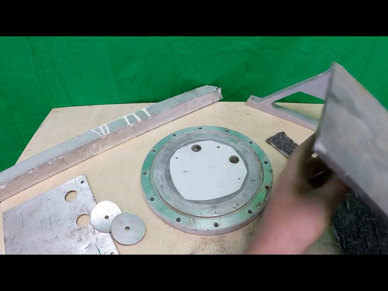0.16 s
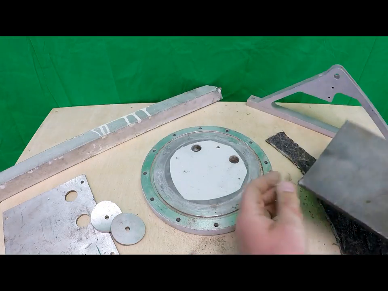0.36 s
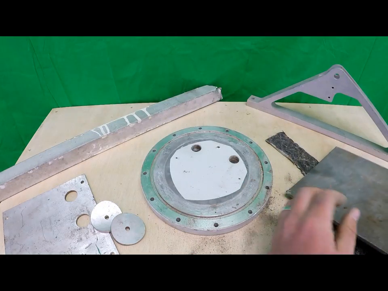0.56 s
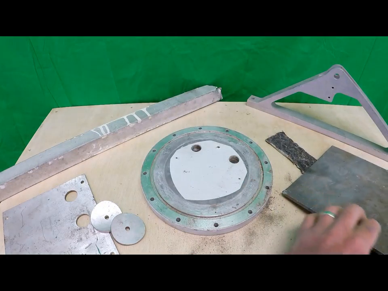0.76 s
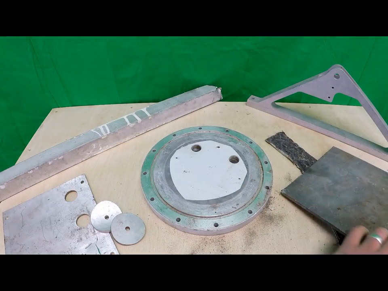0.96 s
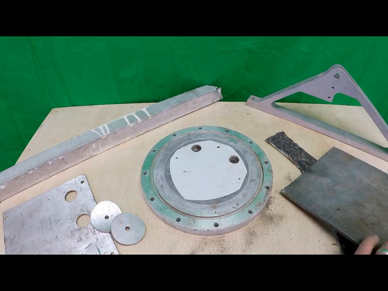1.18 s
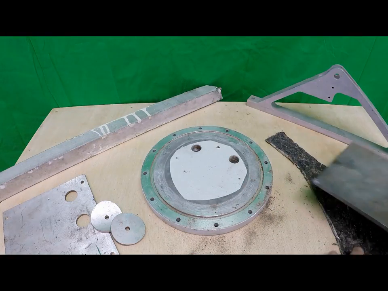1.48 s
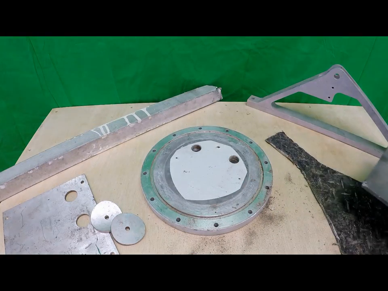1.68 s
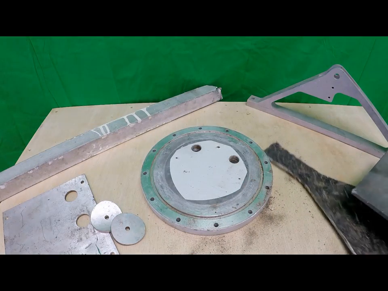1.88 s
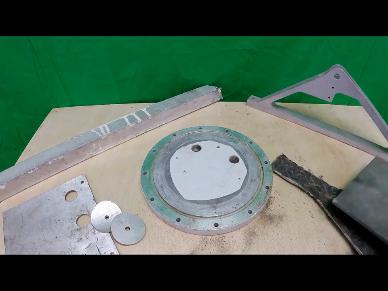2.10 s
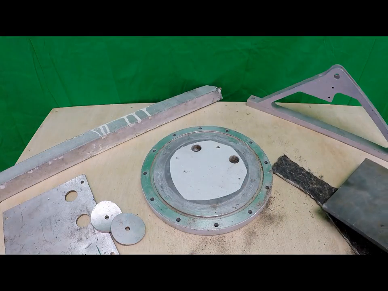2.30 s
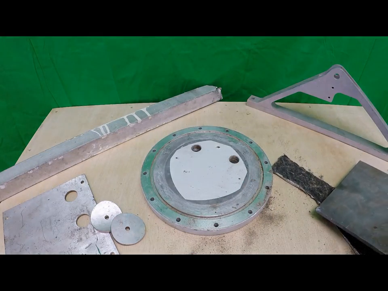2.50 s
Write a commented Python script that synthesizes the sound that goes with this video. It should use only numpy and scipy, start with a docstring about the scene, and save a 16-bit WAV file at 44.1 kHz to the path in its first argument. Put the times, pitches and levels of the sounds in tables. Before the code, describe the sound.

A metal plate knocks and scrapes on a wooden table in a small room.

```python
"""Metal plate on a wooden table

In a small room a metal plate is tipped onto a rubber mat on a table, nudged, dragged and let down.
Its edge ticks and pings; the table answers each knock with a dull thud and rocks a little.
In the drag the edge sticks and slips, so the plate rings and the table top judders.
A faint hiss and a low hum swell and dip underneath."""
import sys
import numpy as np
from scipy import signal
from scipy.fft import rfft, irfft, next_fast_len
from scipy.io import wavfile
from scipy.ndimage import uniform_filter1d

SR = 44100
rng = np.random.default_rng(int(sys.argv[2]) if len(sys.argv) > 2 else 0)


def to_wav(s):
    """Save 16-bit WAV."""
    ch = np.atleast_2d(s).T  # columns
    pcm = np.round(np.clip(ch, -1, 1) * 32767)  # PCM
    wavfile.write(sys.argv[1], SR, pcm.astype(np.int16))


N = 116865


def amp(db):
    """Decibels to gain."""
    return 10 ** (np.asarray(db) / 20)


def unit(x):
    """Scales to an rms of 1."""
    return x / np.sqrt(np.mean(x ** 2) + 1e-20)


def read(points, hz):
    """Reads a curve on a log-frequency axis."""
    freqs, values = np.transpose(points)
    return np.interp(np.log(hz + 1), np.log(freqs + 1), values)


def add(mix, start_s, sound):
    """Drops a sound into the mix."""
    part = mix[round(start_s * SR):][:len(sound)]
    part += sound[:len(part)]


def through(x, response):
    """Passes a sound through an impulse response."""
    return signal.fftconvolve(np.atleast_2d(x), np.atleast_2d(response), axes=1)[:, :N]


def colour(x, eq):
    """Minimum-phase EQ: nothing rings ahead of an attack."""
    log_gain = np.log(amp(read(eq, abs(np.fft.fftfreq(8192, 1 / SR)))))
    spectrum = np.exp(np.conj(signal.hilbert(log_gain)))
    return through(x, np.fft.ifft(spectrum).real[:4096])


def steady(x, span_s):
    """Levels a texture, ironing out swings slower than span_s."""
    power = uniform_filter1d((x ** 2).mean(0), int(span_s * SR))
    return x / np.sqrt(abs(power) + 1e-12)


def ring(modes, damping=1):
    """Dying tones of a struck object, with an energy of 1; damping divides each decay time."""
    t = np.arange(SR) / SR
    tones = sum(amp(db - 60 * t * damping / t60) * np.cos(2 * np.pi * hz * t) for hz, db, t60 in modes)
    return tones / np.linalg.norm(tones)


def body(force, modes, ring_db, damping=1):
    """A force heard directly and through the modes of an object."""
    return force + amp(ring_db) * through(force, ring(modes, damping))


# How alike the room sounds at the two mic ports: freq_hz, coherence
PORT_COHERENCE = [(300, 1), (800, .99), (1500, .8), (4000, .65), (7000, .25), (14000, 0)]

def pair(noises):
    """Makes two unrelated signals alike in the bass, as two close ports hear them."""
    size = noises.shape[1]
    shared, separate = rfft(noises)
    alike = np.clip(read(PORT_COHERENCE, np.fft.rfftfreq(size, 1 / SR)), 0, 1)
    return irfft([alike * shared + np.sqrt(1 - alike ** 2) * separate, shared], size)


# The small room's reverb, before decay_scale: freq_hz, t60_s
ROOM_DECAY = [(100, 0.42), (300, 0.27), (700, 0.25), (2000, 0.17), (6000, 0.29), (14000, 0.098)]

def room(wet_db, decay_scale=1):
    """Direct sound and a dense stereo tail of reflections."""
    hz, t, noise = signal.stft(pair(rng.choice([-1., 1.], (2, SR))), SR, nperseg=256)
    t60_s = decay_scale * read(ROOM_DECAY, hz)[:, None]
    tail = signal.istft(noise * amp(-60 * t / t60_s), SR, nperseg=256)[1]
    response = amp(wet_db) * tail / np.linalg.norm(tail[1])
    response[:, 0] += 1
    return response / np.linalg.norm(response[1])


# Tone of the airy hiss and of the low hum: freq_hz, gain_db
HISS_EQ = [(800, -6.5), (2500, -15.5), (5000, -10.5), (7500, -1), (10000, -0.5), (12500, -5), (15000, -19)]
HUM_EQ = [(20, 4.5), (62, 4), (110, -7.5), (160, -15.5), (240, -16), (330, -23.5), (620, -19.5),
          (850, -38.5), (2000, -45), (5000, -65)]
# Fader moves on the room tone: time_s, hiss_db, hum_db
ROOM_TONE_FADES = [(0, -81.5, -65), (.35, -84, -63.5), (.7, -70.5, -59), (.76, -78, -40.5),
                   (.98, -78.5, -62.5), (1.4, -69, -56.5), (1.85, -66.5, -53.5), (2, -80, -76.5),
                   (2.45, -85, -53), (2.65, -94.5, -61)]

def room_tone():
    """A bed of low room noise and thin hiss, both swelling and dipping."""
    times, hiss_db, hum_db = np.transpose(ROOM_TONE_FADES)
    t = np.arange(N) / SR
    hiss = unit(colour(rng.standard_normal((2, N)), HISS_EQ))
    hum = unit(colour(pair(rng.standard_normal((2, N))), HUM_EQ))
    return amp(np.interp(t, times, hiss_db)) * hiss + amp(np.interp(t, times, hum_db)) * hum


def burst(hz, width_hz):
    """A brief ring around one pitch: the wider the band, the shorter."""
    t = np.arange(1, SR // 50) / SR
    envelope = t * np.exp(-np.pi * width_hz * t)
    return envelope / envelope.sum() * np.sin(2 * np.pi * hz * t)


# The plate's modes, lying flat and overhanging the table's edge: pitch_hz, flat_db, overhang_db
PLATE_MODES = [(1087, -11, -20), (1141, -11, -11), (1312, -14, -10), (1731, -18, -15), (2121, -17, -24),
               (2439, -10, -18), (2680, -18, -12), (2790, -17, -12), (3198, -17, -28), (3420, -14, -10),
               (3785, -21, -12), (4160, -25, -17), (5076, -16, -20), (6325, -20, -20)]
# Bright tone of the plate's edge: freq_hz, gain_db
EDGE_EQ = [(200, -6), (900, -9.5), (1800, 3.5), (4000, 0), (6300, 8), (7800, -3.5), (11000, -5.5),
           (15000, -46.5)]
# Hits of the edge: start_s, tick_db, tick_hz, tick_width_hz, ping_db, ping_hz
EDGE_HITS = [(.584, -36, 7500, 6000, -29.5, 4550), (0.72, -4, 1105, 1034, -19, 3600),
             (.776, -41, 5900, 600, -27.5, 3700), (.994, -41, 5950, 1200, -30.5, 3680),
             (1.351, -30.5, 2400, 1460, -21.5, 3950), (1.421, -30, 2000, 1200, -23, 3750),
             (1.680, -18, 1900, 1620, -11, 3880), (1.871, -12, 5000, 7000, -9.5, 3780),
             (2.043, -11, 3000, 4000, -2, 5880), (2.205, -13, 4800, 4000, -1.5, 3790),
             (2.275, -16, 4100, 2500, -35, 2800), (2.312, -16, 4100, 1800, -15, 6300),
             (2.325, -26, 8000, 9000, -12, 5000), (2.337, -17, 1410, 1200, -15, 1980)]

def edge_clicks():
    """The edge ticks against things, each spot with its own ping; hand and mat damp the plate's ring."""
    level_db, ring_t60_s = 8, 0.045
    force = np.zeros(N)
    for start_s, tick_db, tick_hz, width_hz, ping_db, ping_hz in EDGE_HITS:
        tick = amp(tick_db) * burst(tick_hz, width_hz)
        ping = amp(ping_db) * burst(ping_hz, width_hz=480)
        add(force, start_s, tick + ping)
    modes = [(hz, flat_db, ring_t60_s) for hz, flat_db, _ in PLATE_MODES]
    clicks = colour(body(force, modes, ring_db=-16.5), EDGE_EQ)
    return amp(level_db) * through(clicks, room(wet_db=0, decay_scale=0.25))


def arch(length_s):
    """A rounded swell, quick in and quick out."""
    return np.sin(np.pi * np.arange(0, 1, 1 / (length_s * SR))) ** .5


def slips(per_s, spread_db):
    """Friction as a random train of slips of uneven size."""
    size = amp(spread_db * np.minimum(rng.exponential(1, N), 3))
    return size * rng.choice([-1, 1], N) * (rng.random(N) < per_s / SR)


# Tone of the rub on rubber and of the hollow chatter: freq_hz, gain_db
RUB_EQ = [(400, -23), (1000, -2), (2200, 2), (2950, -11), (3700, 4.5), (4900, -6.5), (5900, 1),
          (7500, -15.5), (14000, -35)]
CHATTER_EQ = [(90, -34), (250, -7), (420, 0), (570, 5), (720, -5.5), (950, -20), (2000, -42.5),
              (4000, -60.5), (12000, -95.5)]
# Light slides on the mat: start_s, length_s, rub_db, chatter_db
MAT_SLIDES = [(0.716, 0.18, -66.5, -35.5), (1.363, 0.13, -66.5, -81), (1.694, 0.092, -54.5, -42.5),
              (1.78, 0.082, -70, -69.5), (2.301, 0.052, -55.5, -42.5)]

def mat_slides():
    """The plate rubs over the mat as it settles or is nudged, and chatters softly against the table."""
    rub_gain, chatter_gain = np.zeros(N), np.zeros(N)
    for start_s, length_s, rub_db, chatter_db in MAT_SLIDES:
        add(rub_gain, start_s, amp(rub_db) * arch(length_s))
        add(chatter_gain, start_s, amp(chatter_db) * arch(length_s))
    rub = unit(colour(slips(per_s=1300, spread_db=3), RUB_EQ))
    chatter = steady(colour(slips(per_s=500, spread_db=-0.5), CHATTER_EQ), span_s=0.022)
    return through(rub_gain * rub + chatter_gain * chatter, room(wet_db=-5, decay_scale=0.82))


def contact(brightness_hz):
    """The push of one cushioned contact: the softer, the longer."""
    t = np.arange(1, SR // 20) / SR
    push = t ** 2 * np.exp(-2 * np.pi * brightness_hz * t * np.sqrt(2))
    return push / push.sum()


# Modes of the table top, before extra damping: pitch_hz, level_db, t60_s
TABLE_MODES = [(136, -4, .2), (153, -6, .25), (186, -6, .18), (229, 0, .4), (290, 2, .35), (345, -9, .15),
               (414, 7.5, .3), (455, -1, .2), (560, -1, .22), (635, 1, .24), (690, -3, .18), (777, -3, .25),
               (817, -4, .25), (934, 0, .25)]
# The table rocking on its legs: pitch_hz, level_db, t60_s
LEG_MODES = [(30.8, 7.5, 0.31), (62.6, 9, 0.22)]
# Dull tone of the wood: freq_hz, gain_db
WOOD_EQ = [(40, -37), (100, -11.5), (145, 2), (300, -9.5), (420, -8), (600, 5.5), (820, -6), (1100, -5.5),
           (1500, -10), (2300, -25.5), (4000, -23.5), (12000, -54)]
# Knocks on the table: start_s, thud_db, brightness_hz, rock_db
TABLE_HITS = [(.721, -15.5, 2163, -41), (.725, -11.5, 1430, -32.5), (.731, -4, 862, -45),
              (0.738, -6, 839, -24), (.771, -2, 397, -8), (0.777, -8, 232, -27), (.797, -13, 787, -12.5),
              (0.819, -9, 265, -10.5), (.875, -32.5, 764, -9), (1.424, -18, 129, -31),
              (1.688, -15, 458, -16), (1.706, 0.5, 185.8, -13), (1.725, -14, 222.6, -5.5),
              (1.764, -19.5, 247, -5.5), (1.879, -2, 694, -4.5), (2.038, 8, 362, -10.5),
              (2.073, 9, 205, -18.5), (2.208, -17, 612, -9.5), (2.327, -18.5, 600, -32),
              (2.337, -8, 1900, -11.5), (2.342, -14.5, 1250, -17), (2.353, -4, 322, -30),
              (2.358, -15.5, 840, -32), (2.382, -23.5, 440, -13.5), (2.4, -12, 378, -21.5)]

def table_knocks():
    """The plate lands on the mat: the table top thuds and the table rocks."""
    thud_gain, rock_gain = amp(22.5), amp(-18.5)
    force, shove = np.zeros(N), np.zeros(N)
    for start_s, thud_db, brightness_hz, rock_db in TABLE_HITS:
        add(force, start_s, amp(thud_db) * contact(brightness_hz))
        add(shove, start_s, amp(rock_db) * contact(brightness_hz=93))
    wood = colour(body(force, TABLE_MODES, ring_db=-10.5, damping=2.19), WOOD_EQ)
    thud = through(wood, room(wet_db=8, decay_scale=0.69))
    legs = ring(LEG_MODES)
    return thud_gain * thud + rock_gain * through(shove, legs / legs.max())


def drift(rate_hz):
    """A slow random wobble with an rms near 1."""
    points, control_hz = 4096, 1000
    lowpass = np.exp(-(np.fft.rfftfreq(points, 1 / control_hz) / rate_hz) ** 2)
    curve = unit(irfft(rfft(rng.standard_normal(points)) * lowpass))
    return np.interp(np.arange(N) / SR, np.arange(points) / control_hz, curve)


def rubbed(hz, wander_hz, flutter_db, rate_hz):
    """One mode kept ringing by friction, unsteady in pitch and level."""
    cycles = np.cumsum(hz + wander_hz * drift(rate_hz)) / SR + rng.random()
    return unit(amp(flutter_db * drift(rate_hz)) * np.sin(2 * np.pi * cycles))


# Low resonances, pitched by where the plate rests: start_s, length_s, pitch_hz, level_db
GROAN_NOTES = [(0.732, 0.027, 693, -25.5), (.775, 0.099, 531.5, -36), (0.842, 0.054, 574, -40),
               (1.884, 0.039, 416, -13), (1.936, 0.085, 622.6, -20), (1.962, 0.065, 409.3, -20),
               (2.025, 0.15, 146, -17), (2.027, .16, 229.9, -25), (2.335, 0.07, 642, -35),
               (2.338, 0.018, 350, -21), (2.331, 0.083, 157.4, -27)]

def groans():
    """Chatter builds up a low resonance of plate and table, which then dies away."""
    t60_s = 0.036
    fall = amp(-60 / (t60_s * SR))
    mix = np.zeros(N)
    for start_s, length_s, hz, db in GROAN_NOTES:
        push = np.zeros(N)
        add(push, start_s, arch(length_s))
        swell = signal.lfilter([1 - fall], [1, -fall], push + 1e-12)
        mix += amp(db) * swell * rubbed(hz, wander_hz=5, flutter_db=1, rate_hz=40) / np.sqrt(2)
    return mix


def weak_modes():
    """A crowd of weak plate modes around the main ones."""
    low_hz, high_hz, spread_db, t60_s = 890.6, 12366, 10.5, 0.25
    return [(low_hz + (high_hz - low_hz) * place ** 1.3, spread_db * size, t60_s)
            for place, size in rng.random((180, 2))]


def plate_ring():
    """Friction sings in the plate's main modes; others take the lead as it overhangs the table's edge."""
    midpoint_s, crossfade_s = 2.09, 0.08
    overhang = np.clip((np.arange(N) / SR - midpoint_s) / crossfade_s + .5, 0, 1)
    mix = np.zeros(N)
    for hz, flat_db, overhang_db in PLATE_MODES:
        gain = amp(flat_db + (overhang_db - flat_db) * overhang)
        mix += gain * rubbed(hz, wander_hz=4, flutter_db=4.5, rate_hz=30)
    return mix


# Tone of the drag's four layers, bass to treble: freq_hz, gain_db
JUDDER_EQ = [(25, -11), (60, -22), (90, -31), (115, -12), (145, 0), (230, -1), (320, -14), (700, -40),
             (6000, -110)]
GRIND_EQ = [(130, -13), (230, -4.5), (290, -3), (410, -5), (520, 3), (650, 2), (790, -3), (950, -5),
            (1400, -12.5), (3000, -46.5), (9000, -93)]
GRIT_EQ = [(500, -22), (1100, -2.5), (1600, -5.5), (2700, -9.5), (3000, -15.5), (8000, -45.5), (13000, -75)]
FIZZ_EQ = [(1500, -25.5), (2600, -12.5), (3000, -12.5), (3600, 5), (4400, 1.5), (6300, -0.5), (7800, -13),
           (9600, -11.5), (10500, -27.5), (13000, -27.5), (15000, -61)]
# Fader moves on the drag, before each layer's trim: time_s, bass_db, mid_db, upper_mid_db, treble_db
DRAG_FADES = [(1.83, -93, -64, -83, -82), (1.845, -46, -59, -85, -60.5), (1.874, -21.5, -25, -40.5, -42.5),
              (1.92, -22, -16, -34, -34), (1.943, -21, -19, -23.5, -32), (1.967, -23.5, -14, -25, -26.5),
              (2.01, -26.5, -15, -24, -30.5), (2.03, -15, -22.5, -34, -34.5),
              (2.04, -19.5, -24.5, -26.5, -33), (2.064, -16.5, -16.5, -29.5, -39),
              (2.13, -22.5, -24.5, -38, -43), (2.168, -35.5, -26, -40.5, -49),
              (2.189, -37, -35, -43, -42.5), (2.208, -22, -30, -36, -41), (2.266, -39.5, -38, -50.5, -50),
              (2.279, -35, -42.5, -46, -45.5), (2.301, -31.5, -44.5, -76, -60),
              (2.31, -36, -59.5, -41, -56)]

def plate_drag():
    """The dragged plate sticks and slips: coarse slips shake the table, fine grains ring the plate."""
    times, *faders = np.transpose(DRAG_FADES)
    t = np.arange(N) / SR
    bass, mid, upper_mid, treble = (amp(np.interp(t, times, db, left=-120, right=-120)) for db in faders)
    table = body(slips(per_s=300, spread_db=-1.5), TABLE_MODES, ring_db=-1.5)
    shake = through(table, room(wet_db=-11))
    plate = body(slips(per_s=2600, spread_db=3.5), weak_modes(), ring_db=-1)
    scratch = through(plate, room(wet_db=0.5, decay_scale=0.61))
    judder = amp(-6) * bass * steady(colour(shake, JUDDER_EQ), span_s=0.02)
    grind = amp(-0.5) * mid * steady(colour(shake, GRIND_EQ), span_s=0.0076)
    grit = amp(-1) * upper_mid * steady(colour(scratch, GRIT_EQ), span_s=0.025)
    fizz = amp(-2.5) * treble * steady(colour(scratch, FIZZ_EQ), span_s=0.009)
    ringing = amp(1.5) * treble * plate_ring()
    return judder + grind + grit + fizz + ringing


def scene():
    """The full mix as it reaches the microphone."""
    return table_knocks() + edge_clicks() + plate_drag() + groans() + mat_slides() + room_tone()


# Level of the left mic port against the right: freq_hz, gain_db
LEFT_BALANCE = [(60, -2), (200, -3), (380, -5.5), (680, -13), (950, -6), (1400, -4), (2400, -2.5),
                (8000, -2), (12000, -7)]
# Phase of the left port against the right: freq_hz, lead_rad
LEFT_LEAD = [(100, 0), (520, -.1), (800, 1.8), (1500, 1.8), (2800, .2), (4200, .1), (5200, -1.3),
             (8000, -1.5)]

def record(dry):
    """The two mic ports differ in level and phase; a steep low-pass takes off the very top."""
    size = next_fast_len(N + SR // 10)
    hz = np.fft.rfftfreq(size, 1 / SR)
    left = amp(read(LEFT_BALANCE, hz)) * np.exp(1j * read(LEFT_LEAD, hz))
    ports = np.array([left, np.ones(len(hz))]) / np.sqrt((1 + abs(left) ** 2) / 2)  # constant power
    heard = irfft(rfft(dry, size) * ports, size)[:, :N]
    lowpass = signal.firwin(255, cutoff=14800, window=("kaiser", 9), fs=SR)
    return signal.oaconvolve(heard, lowpass[None], "same")


dry = scene()
out = record(dry)
to_wav(out)
```